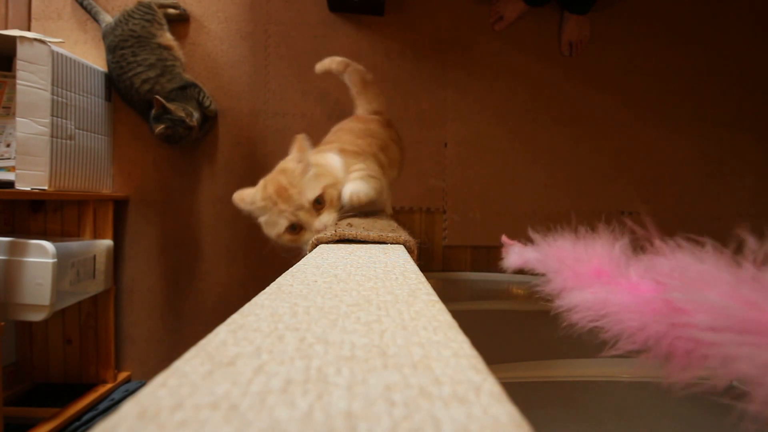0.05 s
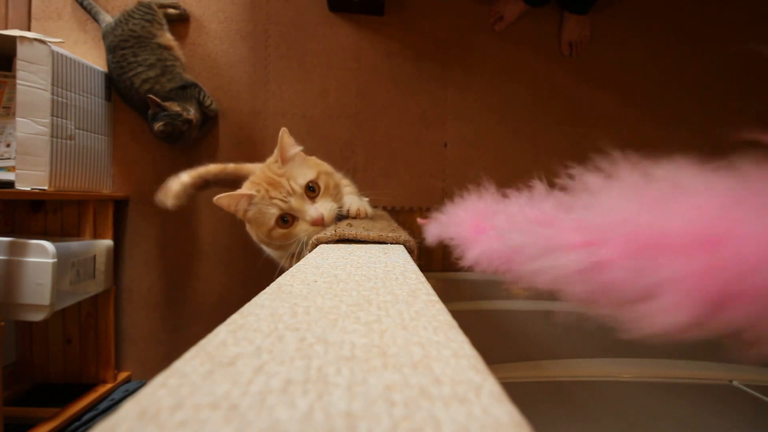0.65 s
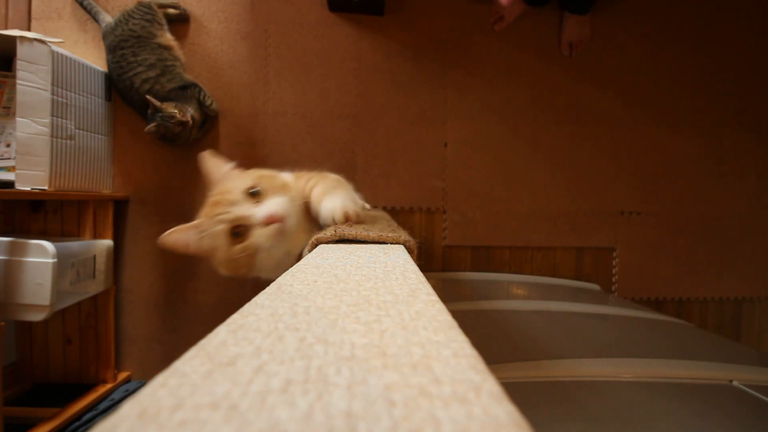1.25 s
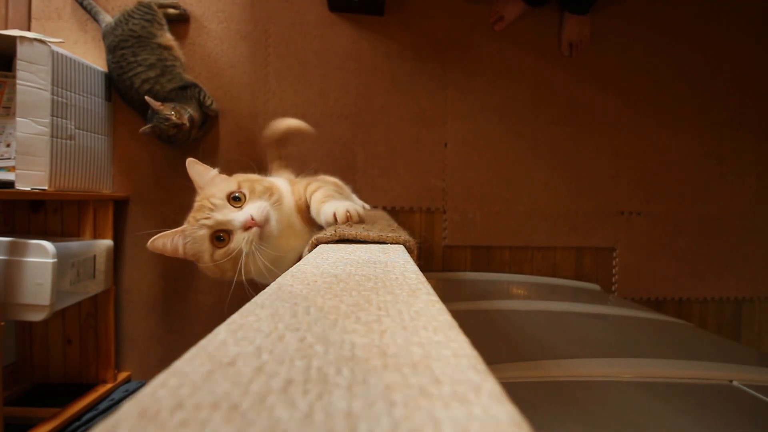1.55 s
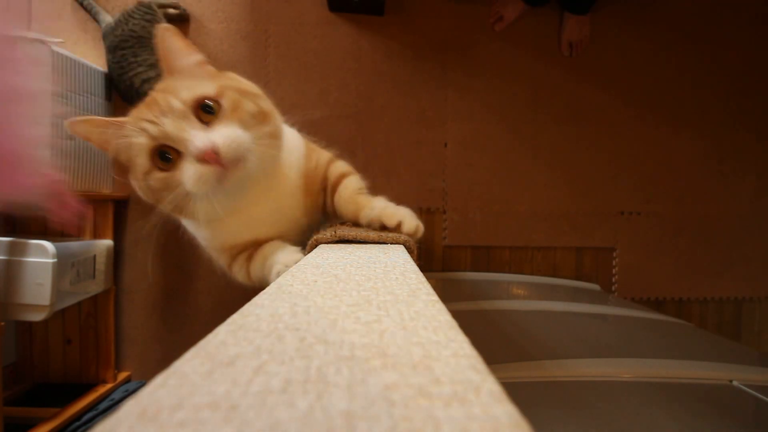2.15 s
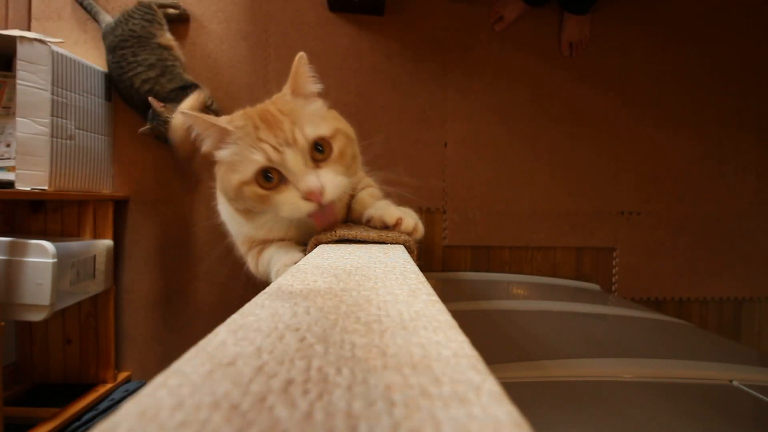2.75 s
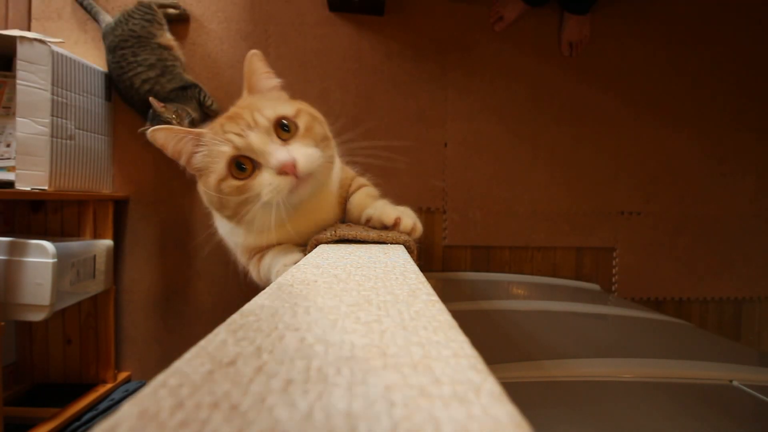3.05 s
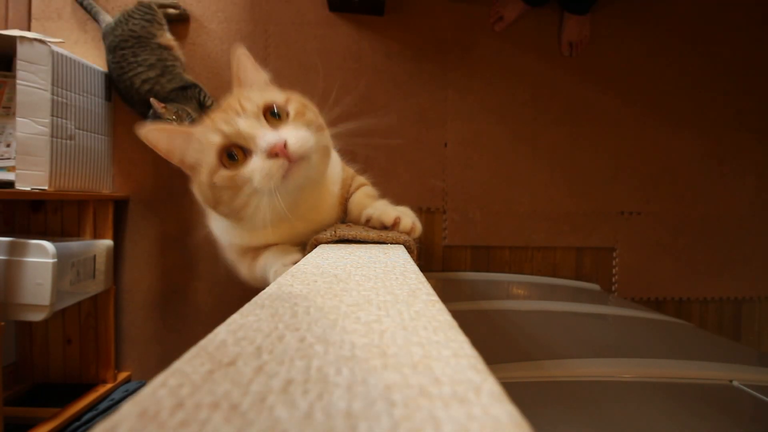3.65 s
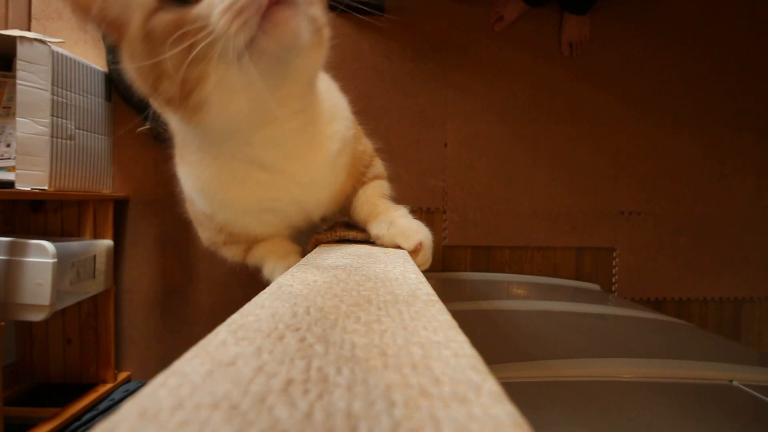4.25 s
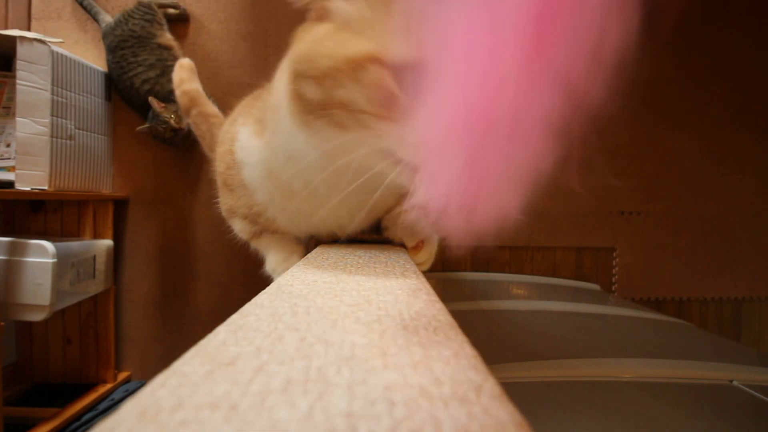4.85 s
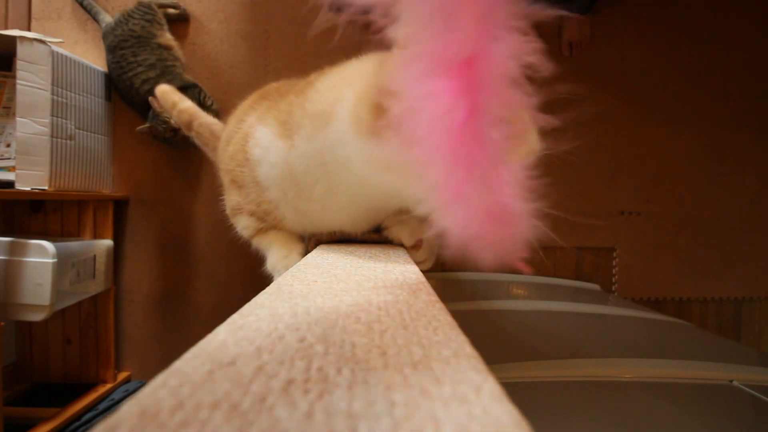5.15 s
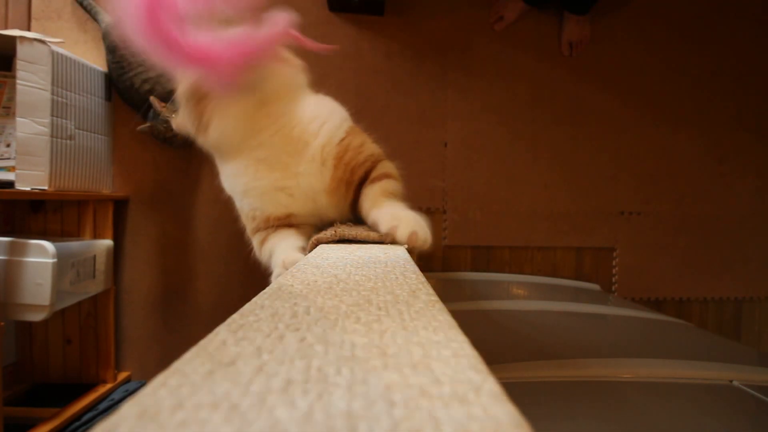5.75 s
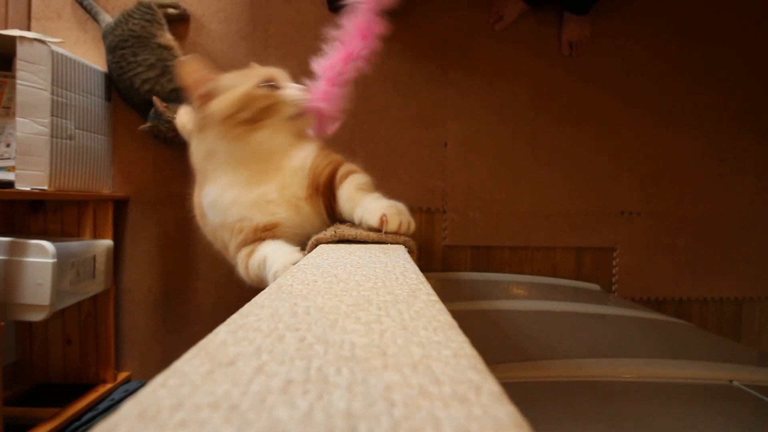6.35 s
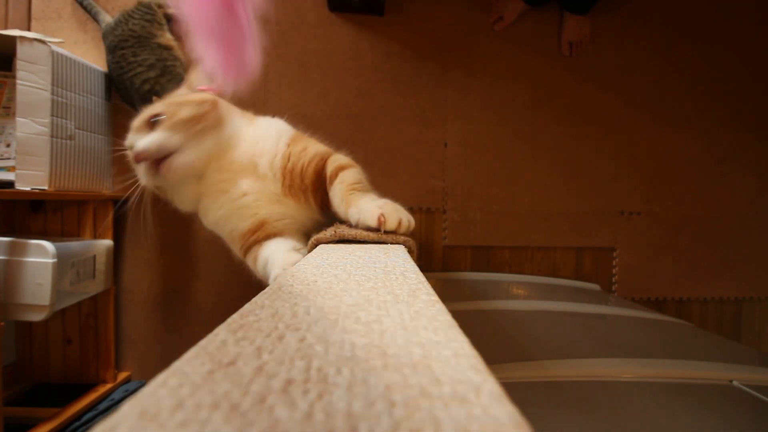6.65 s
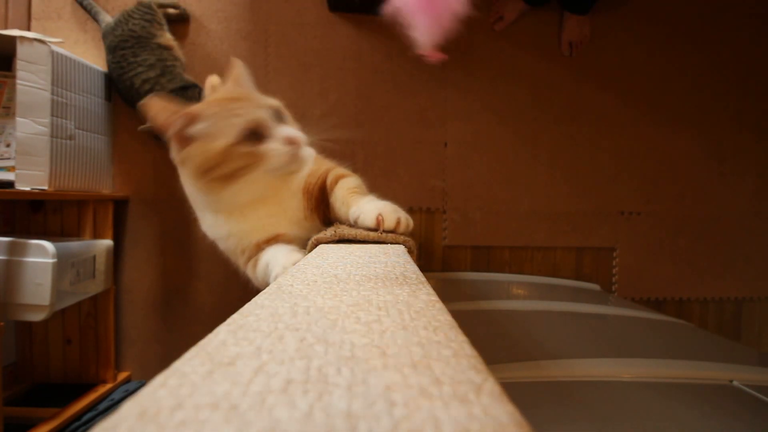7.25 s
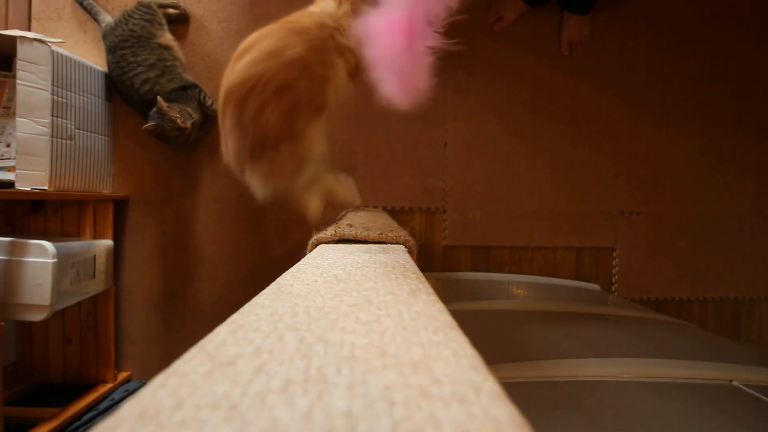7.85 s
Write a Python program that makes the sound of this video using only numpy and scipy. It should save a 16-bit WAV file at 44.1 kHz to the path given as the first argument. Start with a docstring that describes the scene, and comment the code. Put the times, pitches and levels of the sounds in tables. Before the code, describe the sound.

A cat climbs a carpeted board right below the microphone. Its claws rasp through the pile and snap free with sharp, crackling clicks, while paws thump dully and the board rings briefly. A busy run of scratches comes first, then a lull, a few separate bursts and a last flurry, just after a very faint flutter of a feather toy. Fur rustles softly, and the small room has a low hum.

```python
"""A cat's claws rasp through the pile of a tall carpeted board and snap free of its loops as it climbs,
right below the microphone. Each drag is a stream of tiny slips, each snap a sharp pulse with a crackle.
Paws slide, thump and now and then squeak, and the board rings with them. Fur rustles on the carpet,
and near the end comes a faint flutter, like a shaken feather toy. The room is small, with a low hum."""
import sys
import numpy as np
from scipy import signal
from scipy.fft import rfft, irfft, next_fast_len
from scipy.io import wavfile

SR = 44100
rng = np.random.default_rng(int(sys.argv[2]) if len(sys.argv) > 2 else 0)


def dump(signal):
    """Clip the signal to [-1, 1] and save it as 16-bit WAV at the path in sys.argv[1]."""
    limited = np.clip(np.atleast_2d(signal).T, -1, 1)
    pcm = np.round(limited * 32767).astype(np.int16)
    wavfile.write(sys.argv[1], SR, pcm)


N = 348813

# colour of the room's air: f/Hz, relative density/dB
AIR_COLOUR = [(20, -14), (50, -6.5), (90, -12), (125, -9), (200, -10), (350, -11), (460, -15.5),
              (720, -15.5), (1480, -23), (2750, -29), (5080, -36.5), (8000, -31), (12000, -33),
              (16000, -33.5)]
# stereo width of the air: f/Hz, side re mid/dB
AIR_SIDE = [(60, -16), (110, -12.5), (200, -14.5), (380, -9.5), (700, -8.5), (1290, -4), (2380, 1),
            (4400, 4.5), (8120, 1), (15000, 1.5)]
# partials of the appliance hum: f/Hz, rms level/dB
HUM_PARTIALS = [(70, -71.5), (119.6, -58.5), (146, -66.5), (247.6, -69.5), (414.5, -69.5)]
# reverb decay: f/Hz, t60/s
REVERB_DECAY = [(100, 0.7), (260, 0), (700, 0.41), (1800, 0.35), (5000, 0.2), (13000, 0.45)]
# reverb return: f/Hz, level re send/dB
REVERB_LEVEL = [(100, -0.5), (300, -4), (1000, -1), (2500, -7.5), (6000, -12.5), (14000, -14.5)]
# reverb width: f/Hz, side re mid/dB
REVERB_SIDE = [(100, -4.5), (400, -6.5), (1200, -3.5), (4000, 2.2), (14000, 2)]
# colour of fur brushing carpet: f/Hz, relative density/dB
RUSTLE_COLOUR = [(20, -14), (200, 8.5), (900, 0), (2300, -3), (4500, -11.5), (9000, -14), (16000, -27)]
# how hard the cat moves, -52 being the reference and higher values harder effort: t/s, relative level/dB
MOVEMENT = [(0.0, -52), (0.26, -51), (0.75, -56), (1.08, -50), (1.34, -59), (1.61, -59), (1.87, -56),
            (2.07, -49), (2.22, -56), (2.55, -60), (3.7, -63), (3.96, -51), (4.03, -50.5), (4.25, -61),
            (7.36, -62), (7.53, -57), (7.8, -54), (7.91, -51)]
# resonances of the board: f/Hz, bandwidth/Hz, relative level/dB
BOARD_MODES = [(151.3, 56, 2), (190, 16, -0.5), (224, 21, -1), (328, 29, -5.5), (456.6, 10, 2),
               (514, 14, -3), (626.5, 21, 4), (676, 19, 6), (794, 19, -1), (900, 36, 1.5), (1025, 47, 1),
               (1100, 64, -2), (1495, 73, -19), (1780, 24, -9), (1980, 9.5, -9), (2720, 28, -21)]
# paws slide, then take weight (pre-fader): t/s, length/s, slide level/dB, slide f/Hz, thump level/dB
PAW_STEPS = [(0.399, 0.035, -41, 664, -44.5), (.829, 0.047, -51.5, 400, -52.5),
             (0.941, .048, -47.5, 364, -55), (1.006, 0.042, -56, 350, -53.5),
             (1.191, .04, -43.5, 352, -44.5), (1.306, 0.051, -49.5, 370, -54),
             (1.763, 0.037, -43.5, 325, -51), (1.896, 0.02, -37, 420, -36.5),
             (2.03, 0.035, -27.5, 900, -37.5), (2.065, .05, -41, 350, -47), (2.153, 0.047, -40.5, 378, -45),
             (3.81, 0.049, -48.5, 397, -48), (3.885, .036, -31, 423, -39), (3.948, 0.084, -29.5, 593, -49),
             (4.022, .04, -37, 430, -31.5), (4.169, 0.038, -46, 310, -44), (4.548, .05, -56.5, 298, -55),
             (5.769, 0.054, -45, 328, -47.5), (5.818, 0.045, -48, 514, -59),
             (6.312, 0.058, -42.5, 410, -39), (7.557, 0.051, -42.5, 390, -43),
             (7.621, 0.042, -37.5, 426, -37), (7.759, 0.066, -50.5, 402, -52),
             (7.833, 0.041, -38, 536, -45.5)]
# a claw or pad squeaks (pre-fader): t/s, length/s, level/dB, f/Hz
SQUEAK_CUES = [(.945, 0.027, -36, 2600), (1.005, 0.031, -42, 2210), (3.776, 0.012, -45, 2980),
               (7.756, 0.06, -45.5, 900)]
# claws drag through the pile (pre-fader): t/s, length/s, scrape level/dB, scrape f/Hz, fizz level/dB
CLAW_DRAGS = [(.045, 0.04, -45, 1540, -63), (0.139, 0.091, -46.5, 1950, -53.5),
              (0.237, 0.046, -42.5, 2380, -52.5), (0.35, 0.054, -38, 2040, -56),
              (0.398, 0.068, -45, 1640, -58.5), (0.532, 0.066, -48, 1920, -58.5),
              (.675, 0.078, -47.5, 2120, -56), (0.823, 0.13, -46, 1950, -56),
              (0.943, 0.021, -32.5, 2290, -43.5), (1.008, 0.034, -41, 1860, -53.5),
              (1.085, 0.026, -49, 2060, -49), (1.189, .035, -41, 1740, -53),
              (1.299, 0.075, -44.5, 2150, -54.5), (1.898, 0.042, -29.5, 1590, -51),
              (2.034, 0.059, -31, 1470, -52), (2.074, 0.036, -32.5, 2360, -47),
              (2.149, 0.065, -43, 1730, -58), (2.724, 0.13, -54, 2420, -59.5),
              (3.337, 0.054, -61.5, 3520, -67.5), (3.7, 0.2, -52, 2730, -61.5),
              (3.887, 0.032, -34, 1490, -64), (3.933, 0.11, -37.5, 1330, -56.5),
              (4.023, 0.052, -39, 2050, -70), (4.17, 0.047, -39.5, 2940, -48),
              (4.548, 0.051, -48, 2290, -60), (4.665, 0.045, -51, 1840, -62),
              (5.765, 0.073, -43, 1730, -47.5), (6.301, 0.11, -44.5, 1920, -54),
              (7.563, 0.061, -47, 1550, -58.5), (7.62, 0.044, -34, 2150, -52),
              (7.83, 0.085, -44, 1410, -75), (7.886, 0.027, -39, 2060, -55)]
# a claw snaps free of a loop: t/s, peak level/dB, f/Hz, pan left re right/dB
CLAW_SNAPS = [(.0478, -27, 1920, 2), (.1765, -26.5, 3260, 0), (.2, -24, 5230, 1), (.2445, -25, 4800, 1),
              (.2569, -20.5, 4400, -1), (.3521, -14.5, 3100, -2), (.6857, -32, 4800, 13),
              (.708, -30.5, 7400, 18), (.8795, -24.5, 8600, 4), (.9453, -13, 2900, 1),
              (1.0096, -23, 2960, -3), (1.0868, -23, 5160, 0), (1.1794, -28, 4600, -1),
              (1.3226, -31, 5060, 4), (1.8983, -11, 2880, 5), (2.0607, -11, 4940, 7),
              (2.074, -3.5, 9000, 4), (2.1498, -25.5, 2000, -3), (2.3648, -31.5, 2900, 2),
              (3.8885, -22.5, 1620, 14), (4.1705, -18.5, 6750, -1), (4.1817, -15, 6740, 0),
              (4.5335, -28, 6900, -5), (4.633, -33, 12900, -1), (4.671, -44, 2630, -3),
              (4.7051, -28.5, 10500, 1), (5.0723, -32, 1830, 0), (5.5248, -34, 7440, 7),
              (5.7655, -13, 2860, -3), (5.7665, -12, 11000, 1), (5.9334, -35, 3160, 4),
              (6.3055, -33, 3970, 1), (6.3224, -23.5, 6230, 0), (6.3441, -10, 8500, 6),
              (6.3512, -16.5, 3600, -5), (6.6112, -39, 12900, 15), (6.6937, -37.5, 11800, 16),
              (6.8643, -39, 12400, 13), (7.3844, -29.5, 9600, 2), (7.4705, -33, 3550, -1),
              (7.5137, -19.5, 9700, 2), (7.6233, -4.5, 7700, 2), (7.6418, -19, 4630, -11),
              (7.8373, -26, 1420, 5), (7.8887, -22.5, 2500, -1)]

CUTOFF_HZ = 16000


def from_db(db):
    """Decibels to gain."""
    return 10 ** (np.asarray(db) / 20)


def rms_one(x):
    """Scale to rms 1."""
    return x / np.sqrt(np.mean(x ** 2) + 1e-20)


def at_level(x, length, db):
    """Give a burst the energy of a sound of that length and rms level."""
    return x * from_db(db) * np.sqrt(length * SR / (np.sum(x ** 2) + 1e-20))


def at_hz(points, hz):
    """Read a curve on a log-frequency axis."""
    freqs, values = np.transpose(points)
    return np.interp(np.log(np.maximum(hz, 1)), np.log(freqs), values)


def band(x, hz, spread):
    """Band-pass from hz / spread to hz * spread, staying below Nyquist."""
    edges = [hz / spread, min(hz * spread, .45 * SR)]
    return signal.sosfilt(signal.butter(2, edges, "band", fs=SR, output="sos"), x)


def add(track, s, sound):
    """Mix a sound into a track at time s."""
    at = round(s * SR)
    track[..., at:at + sound.shape[-1]] += sound[..., :max(N - at, 0)]


def stereo(mid, side):
    """Left and right from mid and side."""
    return np.array([mid + side, mid - side])


def pan(db):
    """Channel gains that put the left db above the right."""
    return from_db([[db / 2], [-db / 2]])


def lag_right(pair, lag_s):
    """Sound reaches the farther, right microphone a little later."""
    size = next_fast_len(N + 64)
    shift = np.exp(-2j * np.pi * np.fft.rfftfreq(size, 1 / SR) * lag_s)
    return np.array([pair[0], irfft(rfft(pair[1], size) * shift, size)[:N]])


def friction(length, slips_per_s, uneven_db, rise):
    """Tiny random slips under a pressure that swells and lets go; brief contacts attack faster."""
    count = SR // 2
    progress = np.minimum(np.arange(count) / (SR * length), 1)
    skew = np.clip(rise * length / .05, .15, .8)
    pressure = np.sin(np.pi * progress ** skew)
    sizes = from_db(uneven_db * np.minimum(rng.exponential(1, count), 3))
    signs = rng.choice([-1, 1], count)
    slipping = rng.random(count) < slips_per_s / SR
    return pressure * sizes * signs * slipping + 1e-18


def room_tone(air_db=-56.5, waver_rad=0.15):
    """A bed of steady air noise and the slightly wavering hum of an appliance."""
    freqs, t = np.fft.rfftfreq(N, 1 / SR), np.arange(N) / SR
    mid, side = rfft(rng.standard_normal((2, N))) * from_db(at_hz(AIR_COLOUR, freqs))
    mid, side = irfft(mid, N), irfft(side * from_db(at_hz(AIR_SIDE, freqs)), N)
    knots, hum = np.linspace(0, N / SR, 40), 0
    for hz, db in HUM_PARTIALS:
        drift = waver_rad * np.interp(t, knots, rng.standard_normal(len(knots)).cumsum())
        hum += from_db(db) * rms_one(np.sin(2 * np.pi * hz * t + drift))
    return from_db(air_db) * stereo(mid, side) / np.std(mid) + hum


def reverb(send, build_s=0.00057):
    """Diffuse small-room echoes that die octave by octave and open wider in the treble."""
    t, response, spread = np.arange(SR // 2) / SR, 0, np.sqrt(2)
    for hz in 1000 * 2. ** np.arange(-3, 5):
        fade = from_db(-60 * t / at_hz(REVERB_DECAY, hz)) * (1 - np.exp(-t / build_s))
        band_energy = np.sum(band(1. * (t == 0), hz, spread) ** 2)
        mid, side = (rms_one(band(rng.standard_normal(len(t)), hz, spread) * fade) for _ in range(2))
        gain = from_db(at_hz(REVERB_LEVEL, hz)) * np.sqrt(band_energy / len(t))
        response += gain * stereo(mid, side * from_db(at_hz(REVERB_SIDE, hz)))
    return signal.fftconvolve(send[None], response, axes=1)[:, :N]


def flutter(start_s=6.78, end_s=7.44, swishes_per_s=14, swish_s=0.021):
    """A run of soft, uneven swishes, like a shaken feather toy."""
    out = np.zeros(N)
    for s in np.arange(start_s, end_s, 1 / swishes_per_s):
        swish = band(friction(swish_s, 5000, uneven_db=-1, rise=0.99), hz=3180, spread=1.27)
        onset = s + swish_s * rng.uniform(-0.41, 0.62)
        add(out, onset, at_level(swish, swish_s, db=rng.normal(-66.5, 5)))
    return out


def fur(reference_effort_db=-50.5, expansion=1.32, grain_db=5, width=0.47):
    """Fur brushes the carpet: a soft, grainy rustle whose level rides the cat's movement."""
    grains = rng.standard_normal((2, N)) * from_db(grain_db * rng.standard_normal(N))
    colour = from_db(at_hz(RUSTLE_COLOUR, np.fft.rfftfreq(N, 1 / SR)))
    mid, side = irfft(rfft(grains) * colour, N)
    effort_db = np.interp(np.arange(N) / SR, *np.transpose(MOVEMENT)) + 52   # 0 at the -52 reference, above it when the cat strains harder
    return from_db(reference_effort_db + expansion * effort_db) * stereo(rms_one(mid), width * rms_one(side))


def board(force, fader_db=-1):
    """The board rings briefly, each mode a damped resonator."""
    force = force + 1e-12 * rng.standard_normal(N)   # keeps the tails from underflowing
    ring = 0
    for hz, bandwidth, db in BOARD_MODES:
        radius = np.exp(-np.pi * bandwidth / SR)
        poles = [1, -2 * radius * np.cos(2 * np.pi * hz / SR), radius ** 2]
        ring += from_db(db) * (1 - radius ** 2) / 2 * signal.lfilter([1, 0, -1], poles, force)
    return from_db(fader_db) * ring


def pad_push(length, db, hz, spread=1.64):
    """A soft pad pushes on the board: dense slips blur into a dull bump."""
    slips = friction(length, 7000, uneven_db=2.5, rise=0.43)
    return at_level(band(slips, hz, spread), length, db)


def paws(brush_re_scrape_db=-13, fader_db=-1):
    """Each paw slides and lands its weight halfway through; pads also brush along behind the claws."""
    out = np.zeros(N)
    for s, length, slide_db, hz, thump_db in PAW_STEPS:
        add(out, s, pad_push(length, slide_db, hz))
        add(out, s + length / 2, pad_push(length=0.049, db=thump_db, hz=183, spread=1.8))
    for s, length, scrape_db, *_ in CLAW_DRAGS:
        add(out, s, pad_push(length, scrape_db + brush_re_scrape_db, hz=566))
    return from_db(fader_db) * out


def squeaks():
    """A claw or pad sticks and slips in one narrow band: a short, pitched squeak."""
    out = np.zeros(N)
    for s, length, db, hz in SQUEAK_CUES:
        slips = friction(length, 5000, uneven_db=3, rise=0.53)
        add(out, s, at_level(band(slips, hz, spread=1.1), length, db))
    return out


def claw_rasps(overtone_db=-12, scrape_fader_db=-2, fizz_fader_db=-1):
    """Under a dragging claw the backing scrapes in the mids while single fibres fizz in the treble."""
    scrape, fizz = np.zeros((2, N))
    for s, length, scrape_db, hz, fizz_db in CLAW_DRAGS:
        slips = friction(length, slips_per_s=3500, uneven_db=7, rise=0.22)
        bite = band(slips, hz, 1.665) + from_db(overtone_db) * band(slips, 2 * hz, 1.43)
        add(scrape, s, at_level(bite, length, scrape_db))
        ticks = friction(length, slips_per_s=1300, uneven_db=3, rise=0.24)
        add(fizz, s, at_level(band(ticks, hz=7800, spread=1.37), length, fizz_db))
    return from_db(scrape_fader_db) * scrape, from_db(fizz_fader_db) * fizz


def loop_plucks(per_s=28, most=8, centre_hz=8000, scatter_octaves=0.46, scatter_pan_db=10.5):
    """A dragging claw plucks small loops at random: extra cues laid out like CLAW_SNAPS."""
    cues = []
    for s, length, _, _, fizz_db in CLAW_DRAGS:
        waits = (np.arange(most) + rng.random(most)) / per_s
        for wait, (size, pitch, place) in zip(waits, rng.standard_normal((most, 3)).clip(-2, 2)):
            if wait < length:
                peak_db = fizz_db + 22 + 3 * size   # pokes well out of the fizz
                hz = min(centre_hz * 2 ** (scatter_octaves * pitch), CUTOFF_HZ)
                cues.append((s + wait, peak_db, hz, scatter_pan_db * place))
    return cues


def claw_snaps(skirt_db=-8, tug_db=-13, crackle_db=-27, crackle_s=0.0018):
    """A loop lets go: a sharp pulse, a duller tug on the backing, a crackle of fibres springing back."""
    out, t = np.zeros((2, N)), np.arange(SR // 40) / SR
    for s, db, hz, pan_db in [*CLAW_SNAPS, *loop_plucks()]:
        crackle = rng.standard_normal((2, len(t))) * np.exp(-t / crackle_s)
        force = (t == 0) + from_db(crackle_db) * crackle
        click = band(force, hz, 1.55) + from_db(skirt_db) * band(force, hz, 2.7)
        snap = click + from_db(tug_db) * band(force, hz / 3, 2.3)
        add(out, s, snap / np.abs(snap).max() * from_db(db) * pan(pan_db))
    return lag_right(out, lag_s=11e-6)


def scene(snap_to_board_db=-12, thud_db=-3, thud_send_db=1):
    """Claws sound straight into the air; with the paws they also make the board thud and ring."""
    snaps = claw_snaps()
    mono_snaps = snaps.mean(axis=0)
    scrape, fizz = claw_rasps()
    force = paws() + scrape
    thud = from_db(thud_db) * (force + squeaks())
    ring = board(force + from_db(snap_to_board_db) * mono_snaps)
    body = lag_right((thud + ring) * pan(db=1), lag_s=60e-6)
    close = snaps + body + fizz * pan(db=1.2)
    echoes = reverb(mono_snaps + fizz + from_db(thud_send_db) * thud)
    return close + echoes + fur() + room_tone() + flutter()


def record(dry):
    """A steep high cut on the master."""
    return signal.sosfilt(signal.ellip(10, .1, 80, CUTOFF_HZ, fs=SR, output="sos"), dry)


dry = scene()
out = record(dry)
dump(out)
```